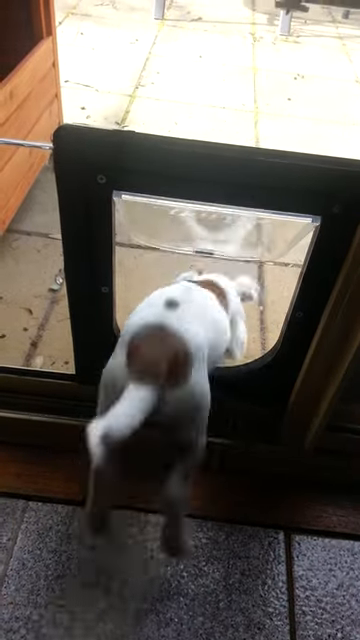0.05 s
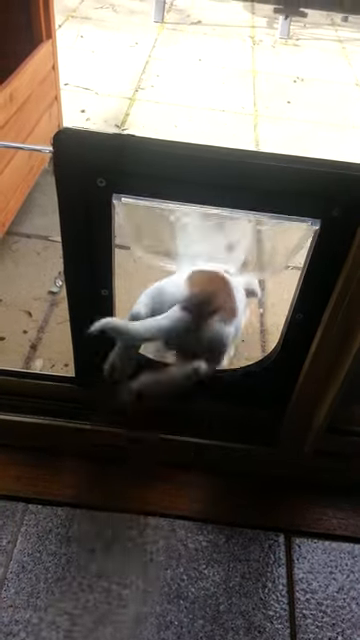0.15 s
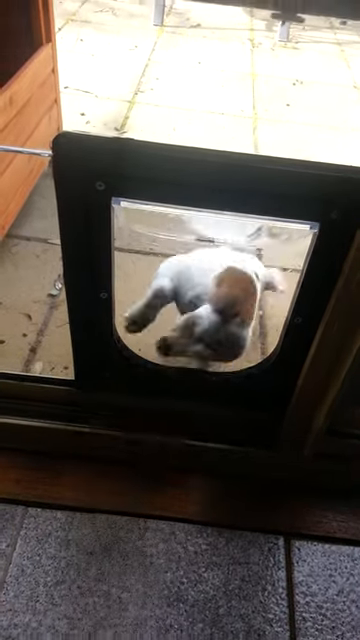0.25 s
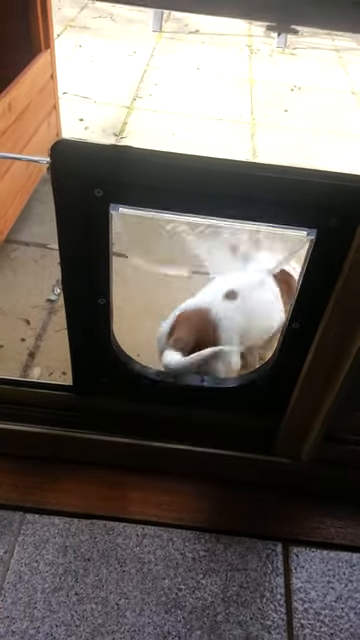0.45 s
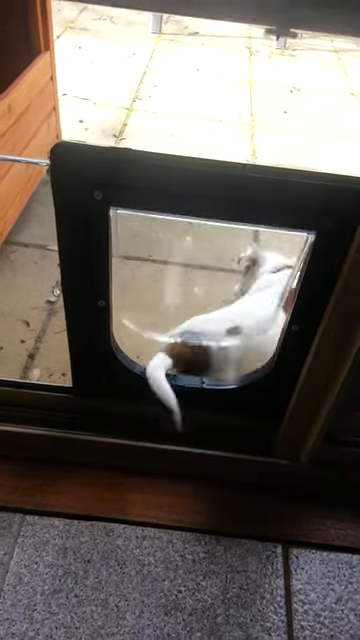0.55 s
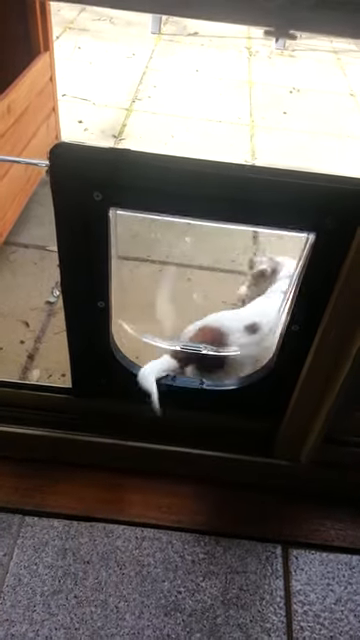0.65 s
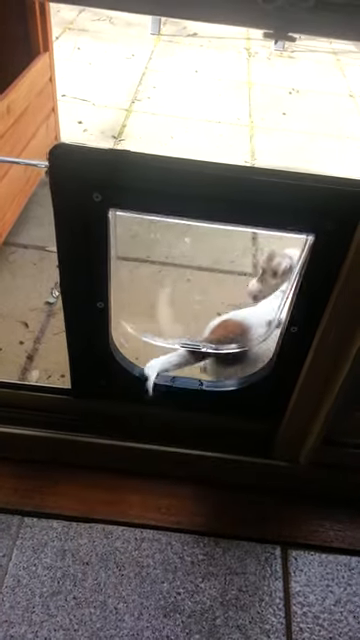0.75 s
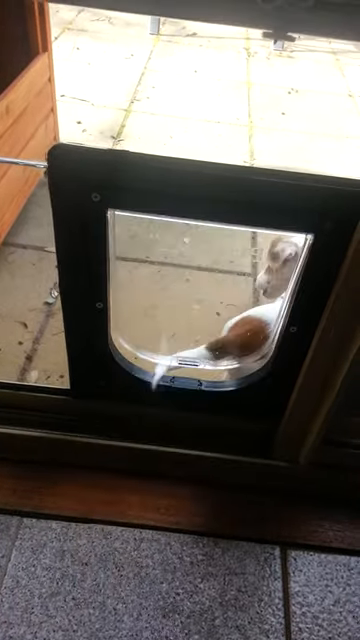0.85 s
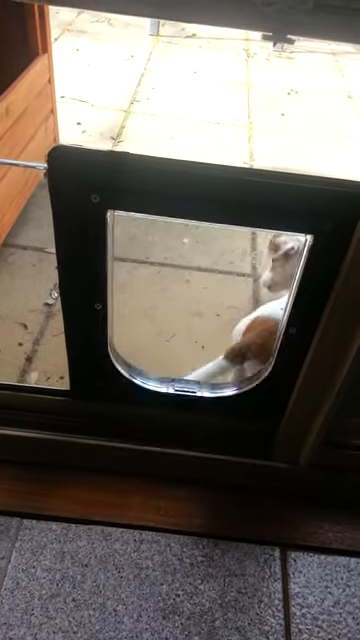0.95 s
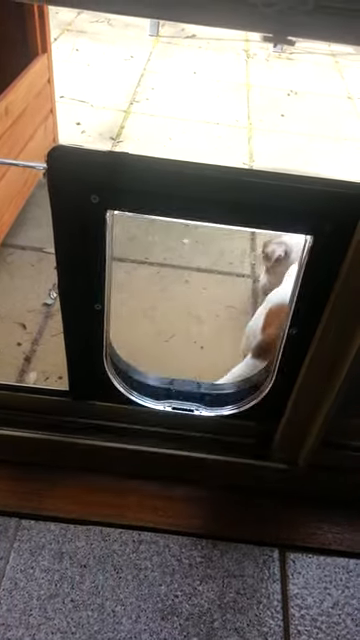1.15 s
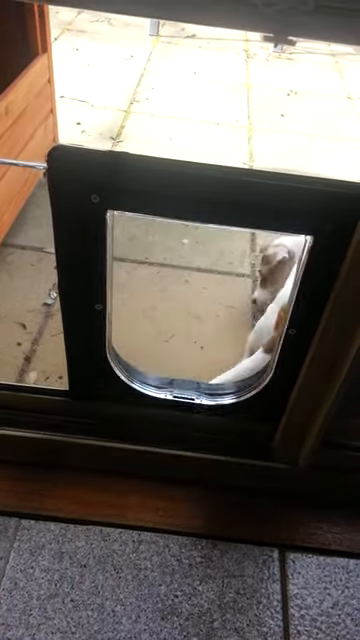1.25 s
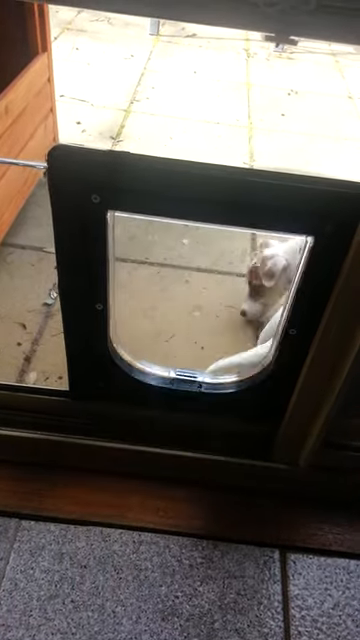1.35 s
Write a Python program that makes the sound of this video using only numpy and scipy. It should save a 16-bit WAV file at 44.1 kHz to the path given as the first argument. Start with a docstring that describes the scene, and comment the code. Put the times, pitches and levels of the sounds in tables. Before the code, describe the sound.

A plastic pet door clatters as a small dog pushes out. Fur rubs faintly along the flap, then the loudest clacks and thumps come at about 0.25 seconds, with a lighter rattle near 0.4. Claws tick faintly twice on the paving around 0.5 seconds. The flap knocks again near 0.65 and shuts softly at about one second, ringing briefly in the fairly live room.

```python
"""A small dog pushes out through a plastic pet door, heard from the fairly live room inside.
First fur rubs along the flap, making friction noise; flap and frame clatter as the hind legs go through.
Claws tick on the paving outside, then the flap knocks and, at about one second, swings shut.
Each impact gives a sharp contact crack and excites the door's damped modes: a clack, a thump and a ring,
which die away in the room's reverberation."""
import sys
import numpy as np
from scipy import signal
from scipy.fft import rfft, irfft, next_fast_len
from scipy.io import wavfile
from scipy.ndimage import uniform_filter1d

SR = 44100
rng = np.random.default_rng(int(sys.argv[2]) if len(sys.argv) > 2 else 0)


def to_wav(sig):
    """Store sig (one row per channel, or 1-D mono) as 16-bit WAV at the path in sys.argv[1].

    Samples outside -1..1 are clipped; the rate is SR.
    """
    pcm = np.clip(np.atleast_2d(sig), -1, 1) * 32767
    pcm = np.round(pcm).astype(np.int16)
    wavfile.write(sys.argv[1], SR, pcm.T)  # frames by channels


N = 61739


def undb(db):
    """Amplitude ratio of a level in decibels."""
    return 10 ** (np.asarray(db) / 20)


def at(points, hz):
    """Interpolation of a curve over log frequency."""
    p = np.array(points, float)
    return np.interp(np.log(np.maximum(hz, 1)), np.log(p[:, 0]), p[:, 1])


def freqs(x):
    """Frequencies of a signal's Fourier components."""
    return np.arange(x.shape[-1] // 2 + 1) * SR / x.shape[-1]


def filtered(x, gain):
    """Linear filtering: each frequency takes its own gain."""
    return irfft(rfft(x) * gain, x.shape[-1])


def pan(db):
    """Left and right gains for a level difference."""
    return undb(np.array([[1], [-1]]) * db / 2)


def octaves(x):
    """Overlapping octave bands, as pairs of centre in Hz and signal."""
    centres = 62.5 * 2 ** np.arange(9)
    return [(hz, filtered(x, np.interp(np.log(freqs(x) + 1), np.log(centres), weights)))
            for hz, weights in zip(centres, np.eye(len(centres)))]


def fade(t, rise, t60):
    """Exponential rise and damping; t60 is the time to decay by 60 dB."""
    return (1 - np.exp(-t / rise)) * np.exp(-np.log(1000) * t / t60)


def add(out, x, start):
    """Superposition of a sound from its start in seconds."""
    i = max(int(start * SR), 0)
    out[:, i:i + x.shape[1]] += x[:, :max(N - i, 0)]


# Stereo width. Each row: frequency in Hz, side level relative to mid in dB.
STEREO_WIDTH = [(60, -17), (130, -15.5), (260, -9), (600, -10), (1100, -1), (2200, -1), (5000, 0)]

def noise(colour, size):
    """Partly coherent noise of unit level: left and right are alike in the bass, apart in the treble."""
    white = rng.standard_normal((2, size))
    f = freqs(white)
    gain, width = undb(at(colour, f)), undb(at(STEREO_WIDTH, f))
    mid, side = filtered(white, np.array([gain, gain * width]) / np.hypot(1, width))
    stereo = np.array([mid + side, mid - side])
    return stereo / stereo.std()


def burst(colour, rise_s, t60_s, size=4096):
    """A transient of exponentially damped noise."""
    return noise(colour, size) * fade(np.arange(size) / SR, rise_s, t60_s)


# Background spectrum. Each row: frequency in Hz, relative spectral density in dB.
BACKGROUND_SPECTRUM = [(25, -12), (60, -14), (110, -1.5), (200, -5), (380, -9), (1600, -19), (3000, -23.5),
                       (6000, -25.5), (11000, -21.5), (15000, -24)]

def background(level_db=-55):
    """Stationary noise, strongest in the bass."""
    return undb(level_db) * noise(BACKGROUND_SPECTRUM, N)


def even(x):
    """Spectral smoothing levels narrow peaks and dips, leaving a response with no note of its own."""
    power = np.mean(np.abs(rfft(x)) ** 2, axis=0)
    ratio = uniform_filter1d(power, size=121) / uniform_filter1d(power, size=15)
    taper = np.minimum(np.linspace(2, 0, x.shape[1]), 1)
    return filtered(x, np.sqrt(np.abs(ratio))) * taper


# Reverberation time. Each row: frequency in Hz, t60 in seconds.
REVERB_TIME = [(100, 0.81), (300, 0.56), (800, 0.6), (2000, 0.53), (5000, 0.58), (13000, 0.18)]
# Strength of the reflections. Each row: frequency in Hz, gain in dB.
REVERB_GAIN = [(60, -15), (200, -1.5), (600, -9.5), (1500, -2.5), (4000, -8), (7000, 2), (14000, -18.5)]

def room(x, rise_s=0.007, size=32768):
    """Reverberation: convolution with diffuse reflections whose treble dies first."""
    t = np.arange(size) / SR
    tail = 0
    for hz, band in octaves(noise([(1, 0), (SR, 0)], size)):
        envelope = fade(t, rise_s, at(REVERB_TIME, hz))
        tail = tail + undb(at(REVERB_GAIN, hz)) * band * envelope / np.linalg.norm(envelope)
    return signal.fftconvolve(x.mean(0)[None], even(tail), axes=1)[:, :N]


# Rubbing of fur and tail. Each row: time in seconds, level in dB.
FUR_LEVEL = [(0, -40), (.07, -42.5), (.11, -43), (.155, -42.5), (.19, -53), (.3, -46), (.6, -53),
             (.625, -44), (.65, -63.5)]
# Friction spectrum. Each row: frequency in Hz, relative spectral density in dB.
FUR_SPECTRUM = [(100, -8.5), (220, 10), (400, -3.5), (650, 1.5), (1500, -2), (3000, -5.5), (4500, -4),
                (6000, -20.5), (12000, -16), (16000, -18)]

def fur(slips_per_s=173, roughness_db=1):
    """Sliding friction: the coat brushes under the flap in small uneven slips."""
    t = np.arange(N) / SR
    slips = np.interp(t * slips_per_s, np.arange(N), rng.standard_normal(N))
    level_db = np.interp(t, *np.array(FUR_LEVEL).T) + roughness_db * slips
    return noise(FUR_SPECTRUM, N) * undb(level_db)


CONTACT_RISE_S, CONTACT_PAN_DB = 0.00042, 4
# Claw contacts. Each row: start in seconds, level in dB.
CLAW_TICKS = [(0.4428, -31), (.537, -28.5)]
# Tick spectrum. Each row: frequency in Hz, relative spectral density in dB.
CLAW_SPECTRUM = [(1500, -22), (4000, 0), (7000, -10), (12000, 9), (16000, -5)]

def claws():
    """Brief impacts are rich in treble: claws tick on the paving as the dog lands outside."""
    out = np.zeros((2, N))
    for start, db in CLAW_TICKS:
        tick = burst(CLAW_SPECTRUM, CONTACT_RISE_S, t60_s=0.008, size=16384)
        add(out, undb(db) * pan(CONTACT_PAN_DB) * tick, start)
    return out


def excitation(hz, tilt, spot_hz, spot_db=5.5, spot_octaves=0.16):
    """Modal excitation: a blow's hardness tilts the spectrum, and where it lands favours one band."""
    hz = np.maximum(hz, 1)
    spot = np.exp(-.5 * (np.log2(hz / spot_hz) / spot_octaves) ** 2)
    return undb(tilt * np.clip(np.log2(hz / 800), -2, 2) + spot_db * spot)


BUILD_CYCLES = 0.71  # rise time constant of a mode, in periods
# Strongest door modes. Each row: frequency in Hz, relative level in dB, t60 in seconds.
RING_MODES = [(239.5, -25.5, 0.55), (344.2, -18, .5), (503, -27, 0.26), (620, -4.5, 0.35),
              (722.7, -16, 0.24), (725, -13.5, 0.14), (877, -14.5, 0.51), (1011, -21, 0.21),
              (1074, -28, 0.53), (1268.4, -13.5, 0.38), (1335, -10, 0.15), (1492, -7.5, 0.13),
              (1552, -26.5, 0.48), (2810, -16, 0.19)]

def ringing(tilt, spot_hz, trim_db=-2, scatter_db=3, size=32768):
    """Free vibration: the door's lightly damped modes ring on after a blow."""
    t, out = np.arange(size) / SR, 0
    draws = rng.standard_normal((len(RING_MODES), 3))
    for (hz, db, t60), (strength, turn, apart) in zip(RING_MODES, draws):
        stereo_phase = np.array([[1], [-1]]) * apart * undb(at(STEREO_WIDTH, hz))
        phase = 2 * np.pi * (hz * t + turn) + stereo_phase
        gain = excitation(hz, tilt, spot_hz) * undb(db + trim_db + scatter_db * strength)
        out = out + gain * np.sin(phase) * fade(t, BUILD_CYCLES / hz, t60)
    return out


# Low door modes. Each row: frequency in Hz, relative level in dB, t60 in seconds.
FLEX_MODES = [(77, -14.5, .14), (132.9, -22.5, .3), (171.4, -5, 0.19), (203.5, 5, 0.092),
              (231.5, -17, 0.12)]

def thump(rise_s=0.012, size=16384):
    """Flexural vibration: the whole door bends in its low modes."""
    t = np.arange(size) / SR
    return sum(undb(db) * np.sin(2 * np.pi * hz * t) * fade(t, rise_s, t60)
               for hz, db, t60 in FLEX_MODES)[None]


# The panel's dense lesser modes. Each row: frequency in Hz, relative spectral density in dB.
CLACK_SPECTRUM = [(30, -55), (100, -15), (170, -11), (250, -3), (400, -8), (560, 0.5), (850, -3),
                  (1400, -3), (2000, -5.5), (3200, -13), (4500, -17.5), (5800, -32.5), (8000, -37.5),
                  (14000, -65)]
# Their damping. Each row: frequency in Hz, t60 in seconds.
CLACK_DECAY = [(150, 0.3), (600, 0.22), (2000, 0.11), (5000, 0.1), (14000, 0.048)]

def clack(tilt, spot_hz, size=12288):
    """Modal overlap: the struck panel's dense, short modes merge into noise."""
    t = np.arange(size) / SR
    modes = noise(CLACK_SPECTRUM, size)
    driven = filtered(modes, excitation(freqs(modes), tilt, spot_hz))
    return sum(band * fade(t, BUILD_CYCLES / hz, at(CLACK_DECAY, hz)) for hz, band in octaves(driven))


# Spectra of the crack and its snap. Each row: frequency in Hz, relative spectral density in dB.
CRACK_SPECTRUM = [(500, -15), (1500, -8), (2600, 7), (3300, -5.5), (4300, 8), (5000, -2.5), (5900, -17),
                  (8000, -20), (16000, -32)]
SNAP_SPECTRUM = [(4500, -22), (6000, 0), (8000, -3.5), (10500, 5.5), (13000, -1), (16000, -2)]

def crack(snap_db, snap_lift_db=2):
    """Contact transient: plastic meets plastic, and a sharper contact adds a thin snap on top."""
    body = pan(CONTACT_PAN_DB) * burst(CRACK_SPECTRUM, CONTACT_RISE_S, t60_s=0.023)
    snap = pan(db=6.5) * burst(SNAP_SPECTRUM, rise_s=0.0025, t60_s=0.014)
    return body + undb(snap_lift_db + snap_db) * snap


# Blows on flap and frame. Each row: start in seconds, panel gain in dB, tilt in dB per octave,
# favoured frequency in Hz, thump gain in dB, crack gain in dB, snap gain within the crack in dB.
DOOR_BLOWS = [(.0795, -29, -1, 830, -25.5, -39.5, 3), (.111, -42.5, -13, 630, -28, -61, -6),
              (.2243, -15, 0, 845, -32.5, -12, -7.5), (.2322, -10.5, -1, 692, -10, -20.5, 5.5),
              (.2405, -18.5, 4, 985, -8, -20.5, -6), (0.2527, -25, 7.5, 910, -43, -13.5, -13),
              (.263, -17.5, 0, 1390, -50, -24, -1), (0.2761, -43, -7, 656, -47, -12.5, -2.5),
              (.370, -22, -1.5, 980, -39, -25, -19), (.376, -22, -2, 720, -49, -50, -15),
              (.3835, -31.5, 8.5, 940, -54, -36, -10), (.3925, -20, 3.5, 640, -33.5, -29, -48),
              (.403, -21, 1, 1200, -48, -32, -15), (.411, -25.5, -3.5, 1290, -63, -44, -20),
              (.629, -24.5, 1, 2620, -28, -21.5, -5.5), (.643, -22.5, 2, 660, -30.5, -46, -26),
              (0.66, -30.5, 4, 1040, -22, -30, -1), (.6688, -25.5, 5, 1010, -50, -17.5, -6.5),
              (.677, -21.5, 0, 760, -29, -26, -8), (1.013, -44, -2.5, 400, -28, -69, -15),
              (1.0205, -28, -0.6, 1640, -30, -39, -12), (1.025, -28.5, -2.5, 326, -41, -35.5, -28)]

def knocks():
    """Impact excitation: each blow cracks and clacks, thumps the door and leaves it ringing."""
    blows, thumps, ring = np.zeros((3, 2, N))
    flex = thump()
    for start, panel_db, tilt, spot_hz, thump_db, crack_db, snap_db in DOOR_BLOWS:
        add(blows, undb(panel_db) * clack(tilt, spot_hz), start)
        add(blows, undb(crack_db) * crack(snap_db), start)
        add(thumps, undb(thump_db) * flex, start)
        add(ring, undb(panel_db) * ringing(tilt, spot_hz), start)
    return blows, thumps, ring


# Stereo balance. Each row: frequency in Hz, left level relative to right in dB.
LEFT_BALANCE = [(250, 0), (1000, 0), (2000, 0.5), (4000, 3), (12000, 4)]

def scene(thump_to_room_db=-12.5, left_lag_s=0.00007):
    """Direct and reverberant sound superpose, brighter on the left, over a quiet background."""
    blows, thumps, ring = knocks()
    contacts = blows + claws() + fur()
    reverb = room(contacts + undb(thump_to_room_db) * thumps)
    padding = next_fast_len(N + SR // 10) - N
    heard = np.pad(contacts + thumps + ring + reverb, ((0, 0), (0, padding)))
    f = freqs(heard)
    lag = np.exp(-2j * np.pi * f * left_lag_s * np.array([[1], [0]]))
    return filtered(heard, pan(at(LEFT_BALANCE, f)) * lag)[:, :N] + background()


def record(dry):
    """Clipping at full scale, then band limiting by a steep low-pass filter."""
    cutoff_hz = 14650
    lowpass = signal.ellip(8, .2, 80, cutoff_hz, fs=SR, output="sos")
    return signal.sosfilt(lowpass, np.clip(dry, -1, 1))


dry = scene()
out = record(dry)
to_wav(out)
```